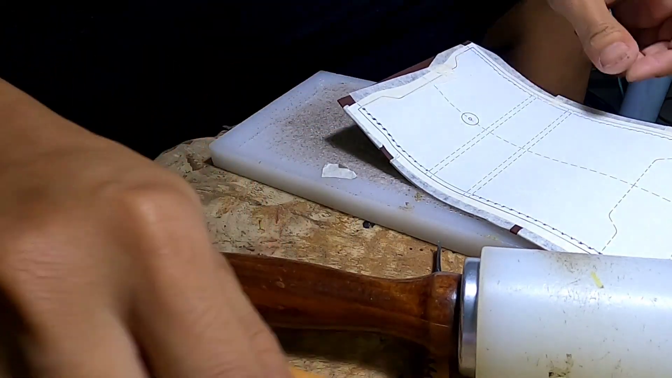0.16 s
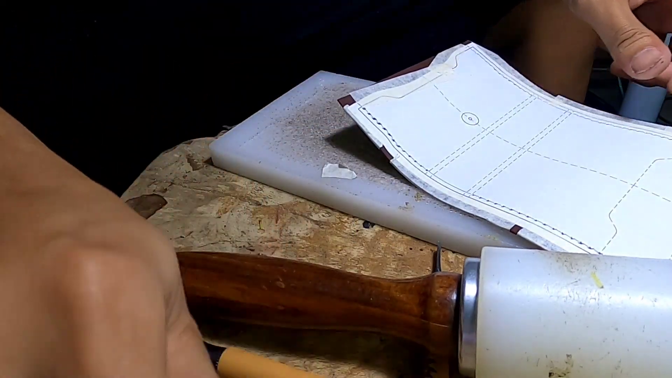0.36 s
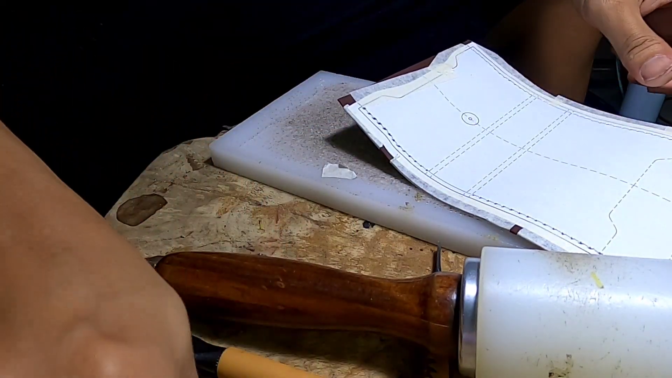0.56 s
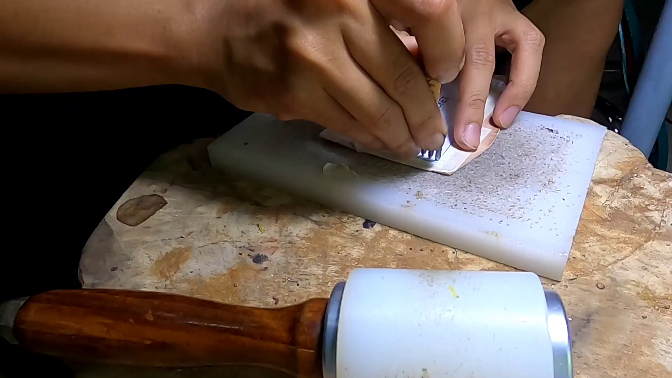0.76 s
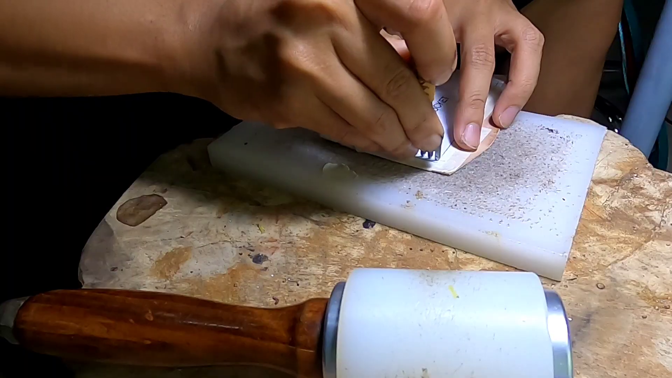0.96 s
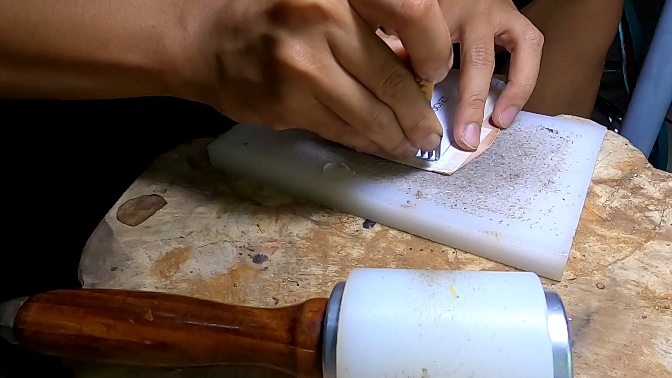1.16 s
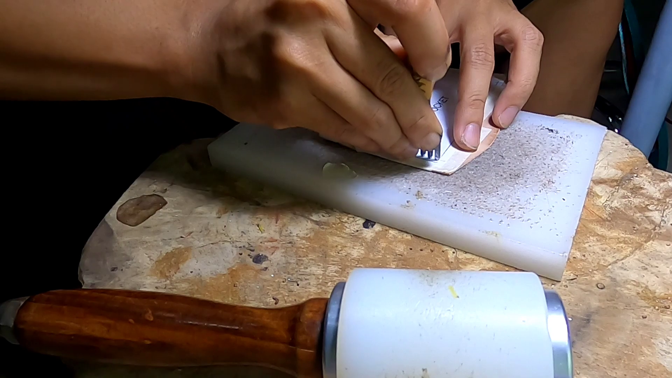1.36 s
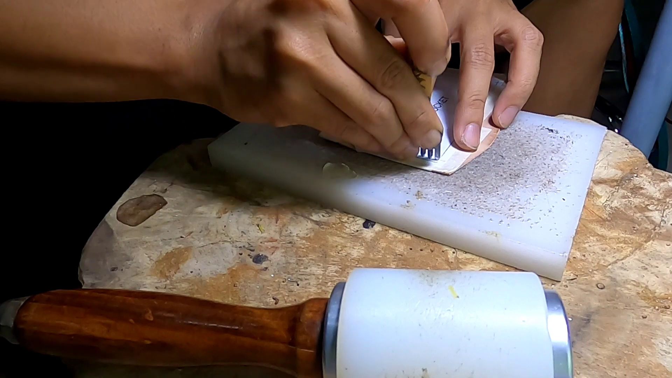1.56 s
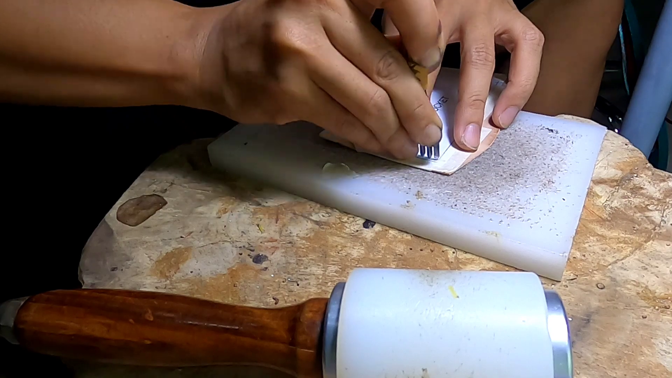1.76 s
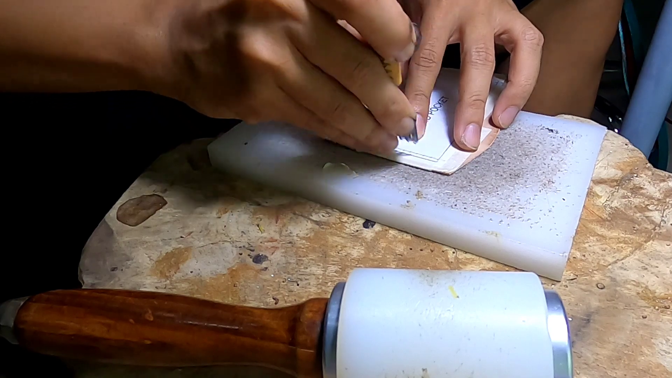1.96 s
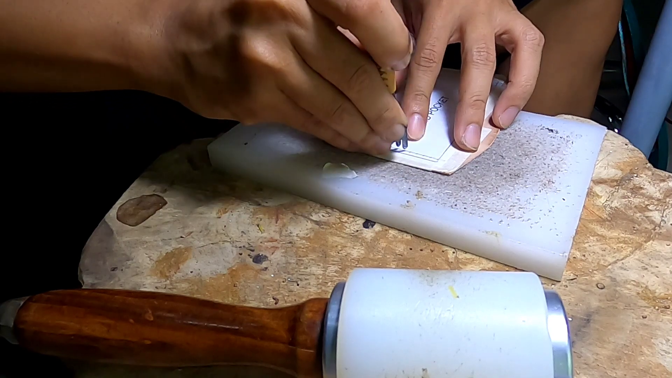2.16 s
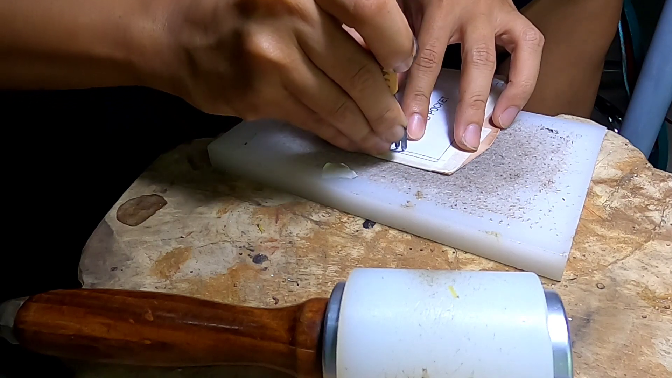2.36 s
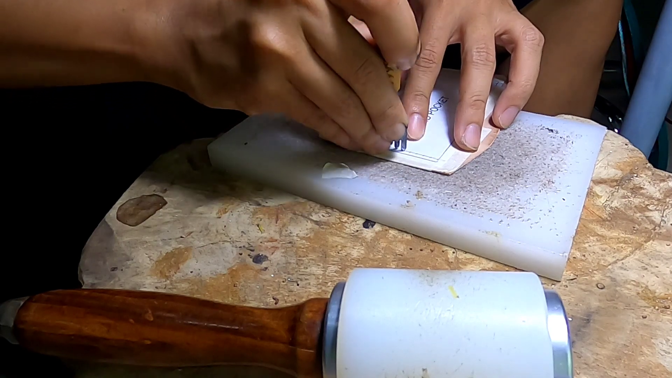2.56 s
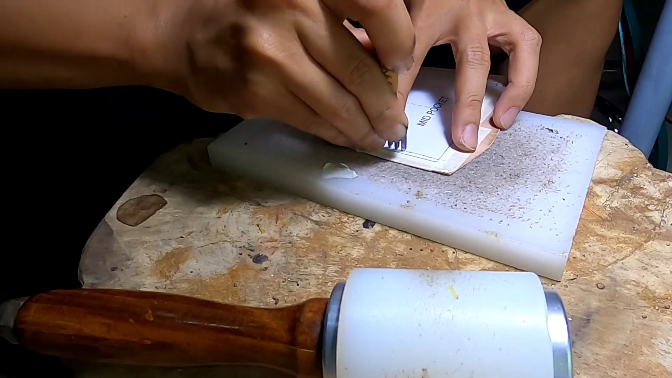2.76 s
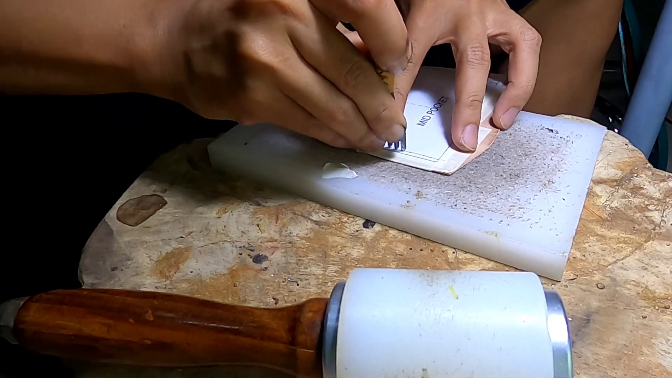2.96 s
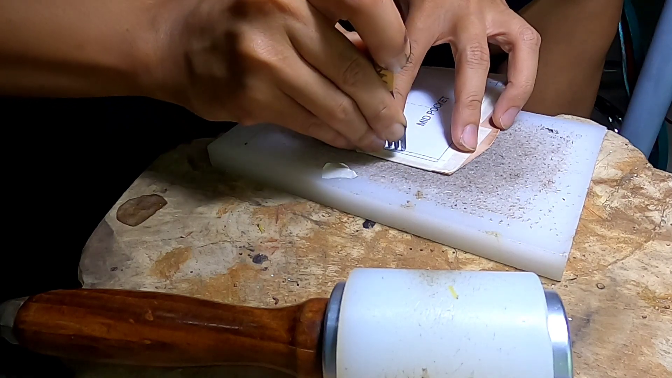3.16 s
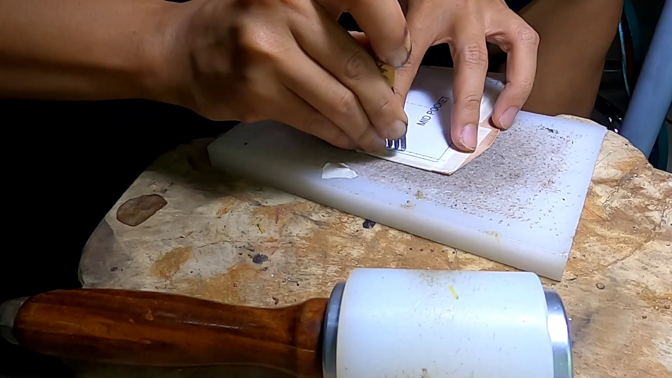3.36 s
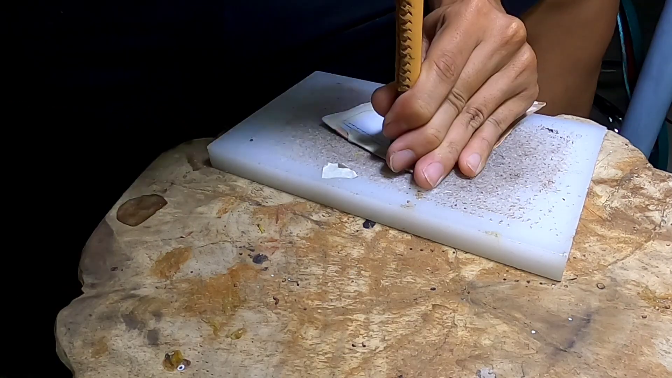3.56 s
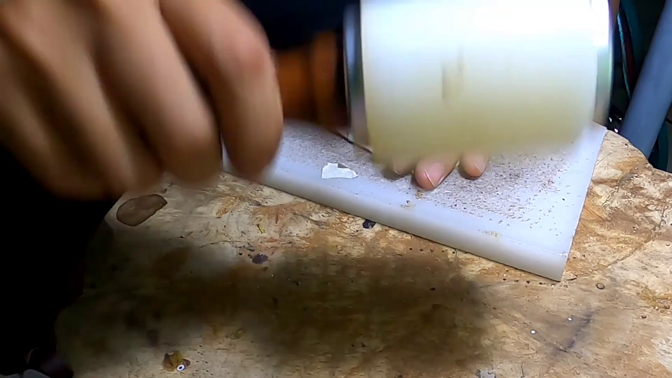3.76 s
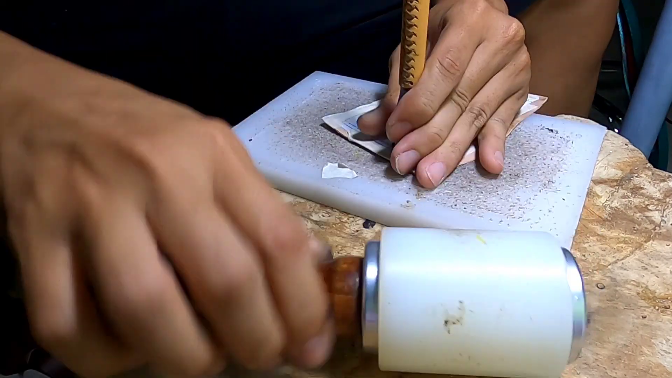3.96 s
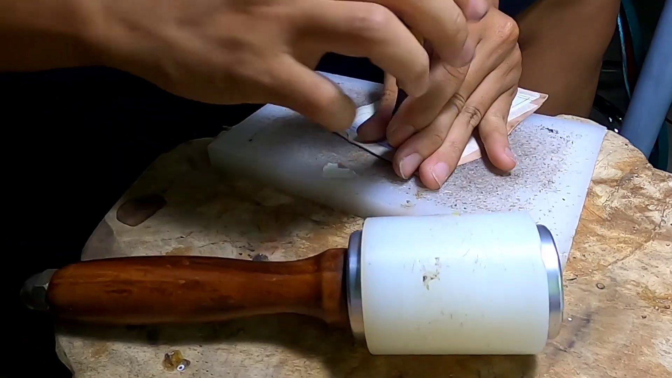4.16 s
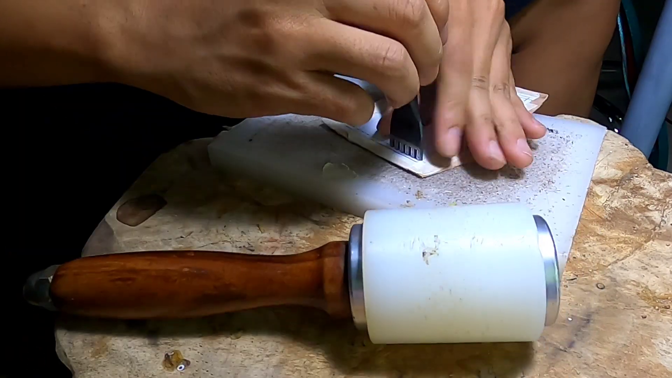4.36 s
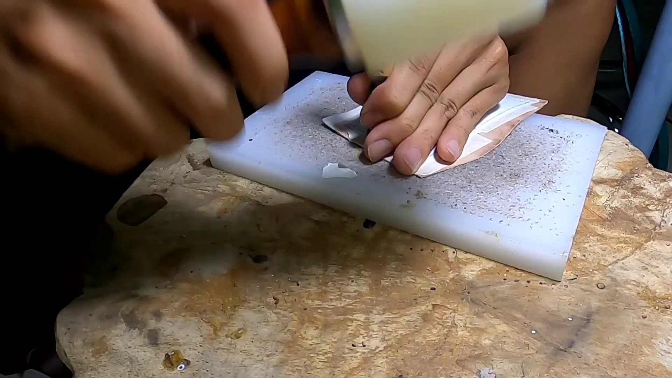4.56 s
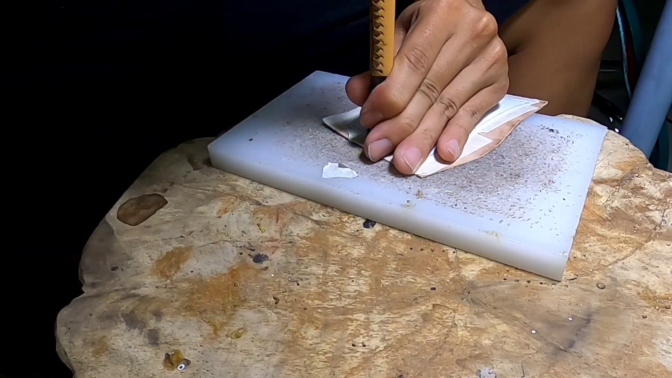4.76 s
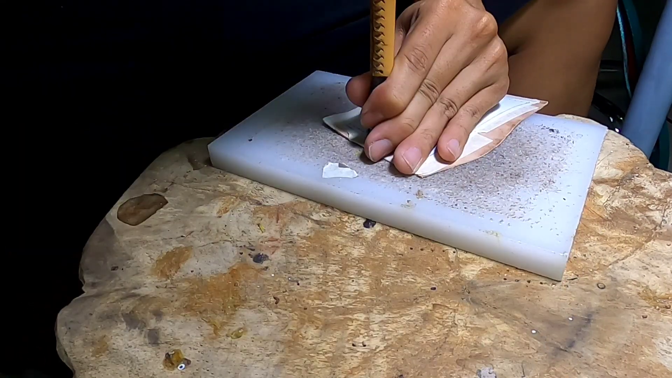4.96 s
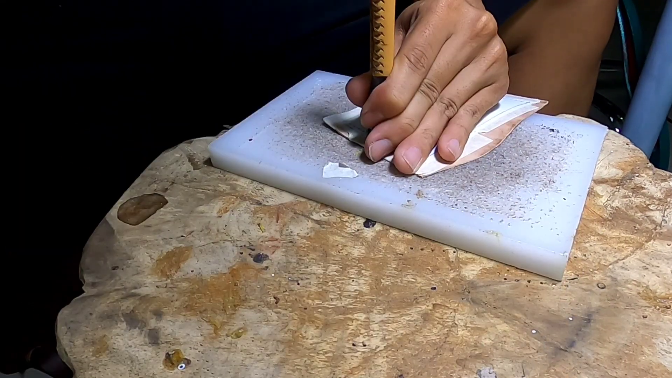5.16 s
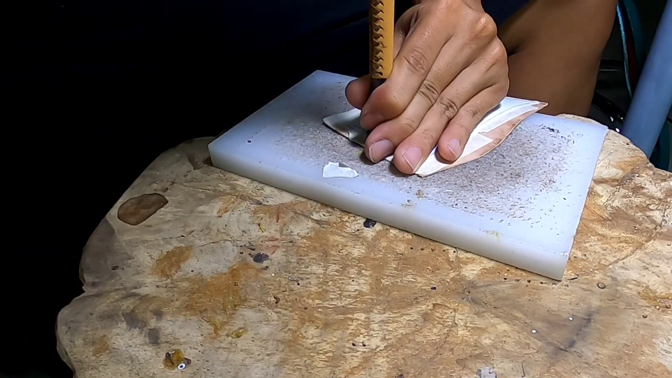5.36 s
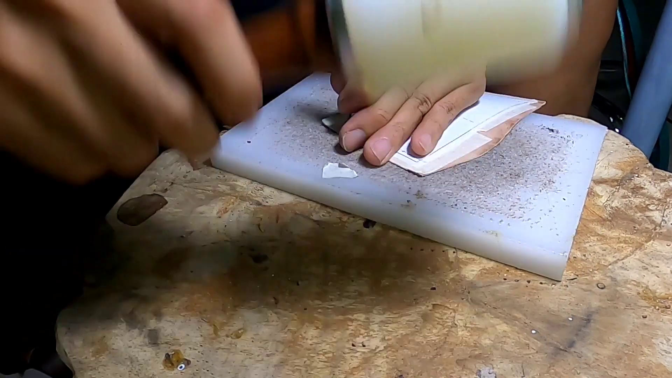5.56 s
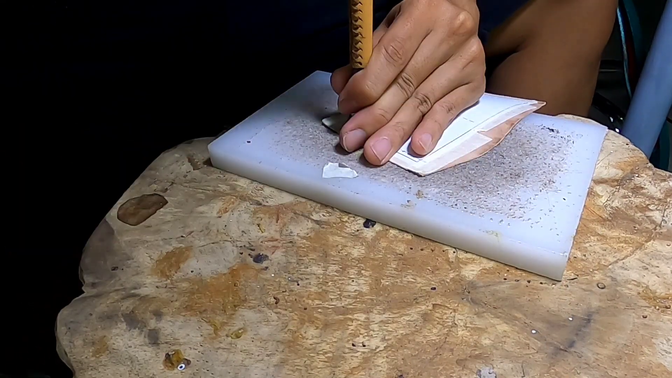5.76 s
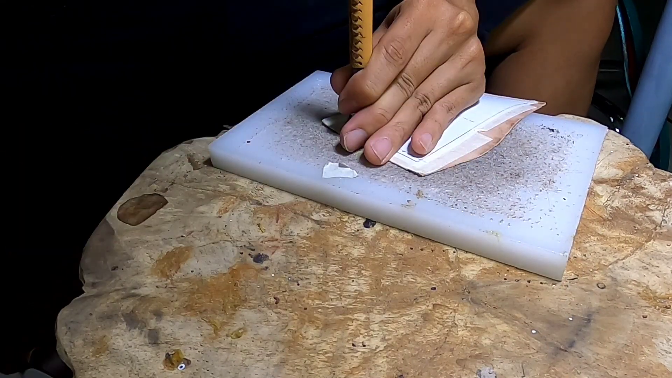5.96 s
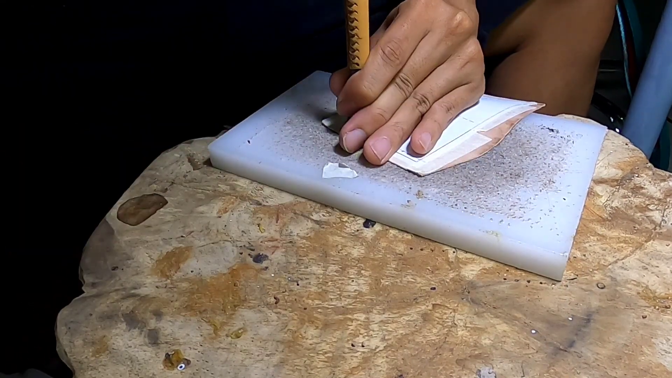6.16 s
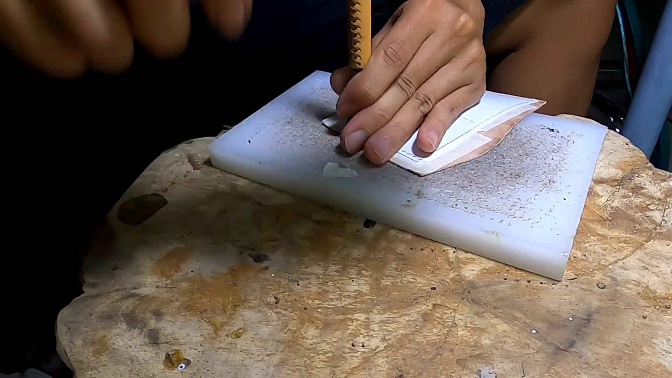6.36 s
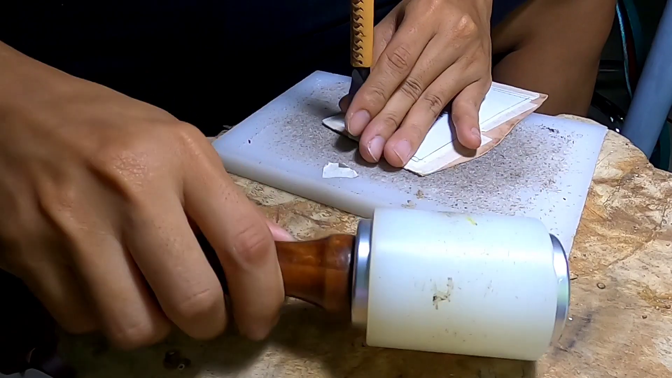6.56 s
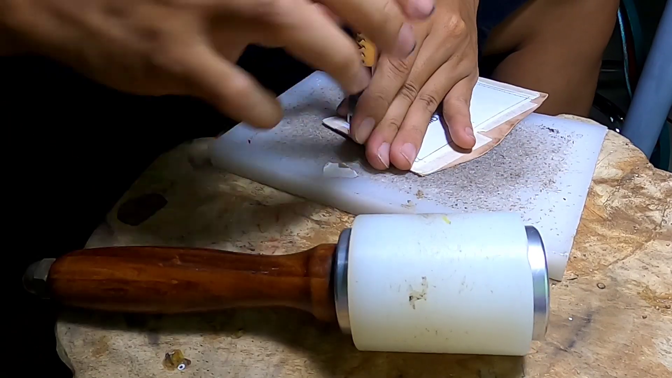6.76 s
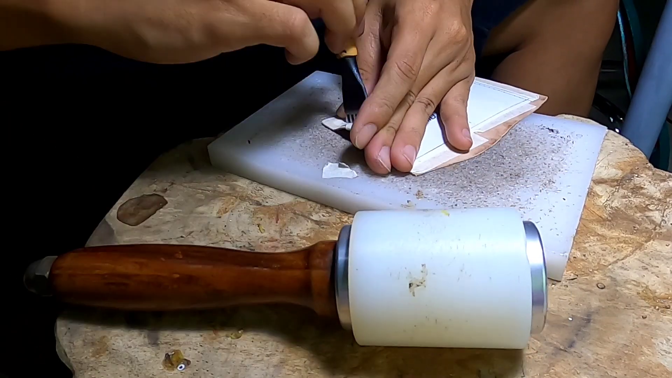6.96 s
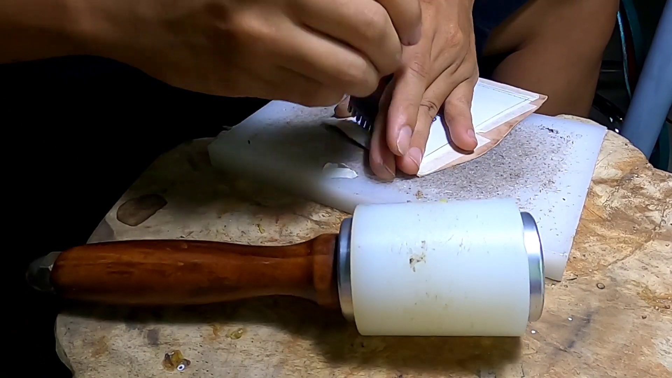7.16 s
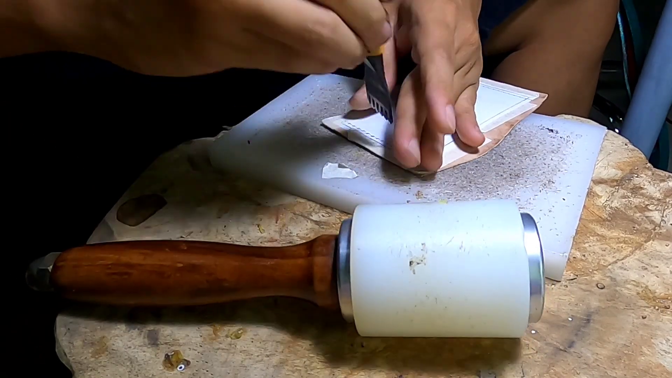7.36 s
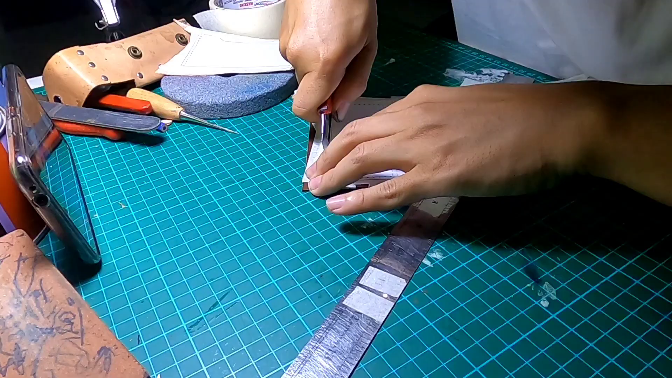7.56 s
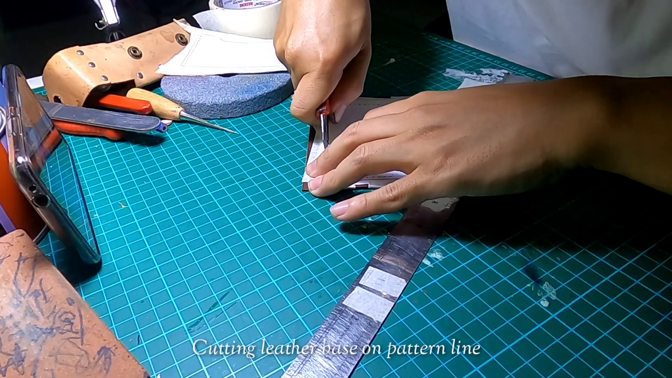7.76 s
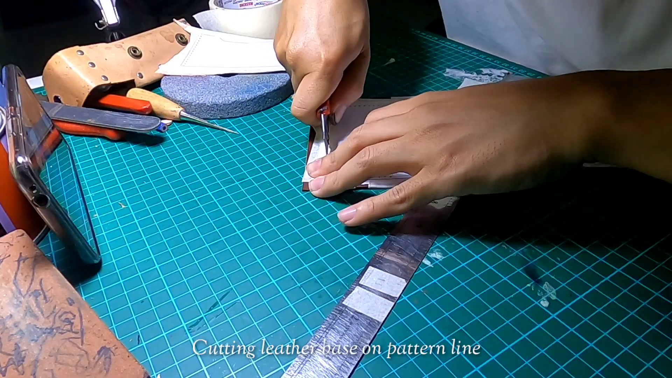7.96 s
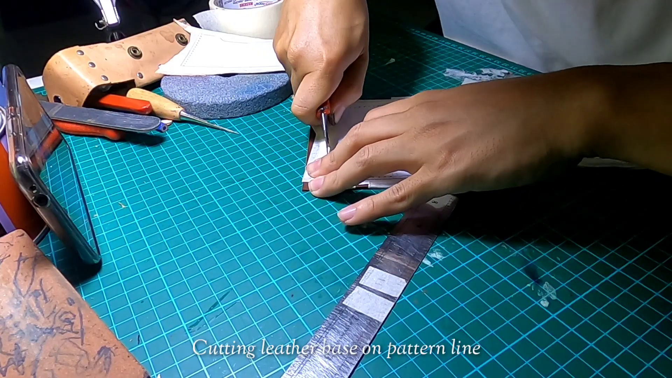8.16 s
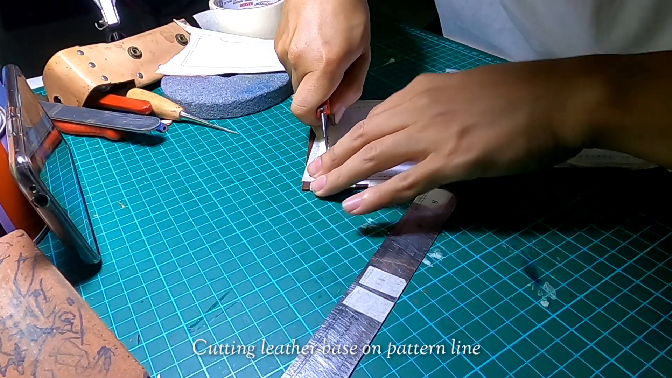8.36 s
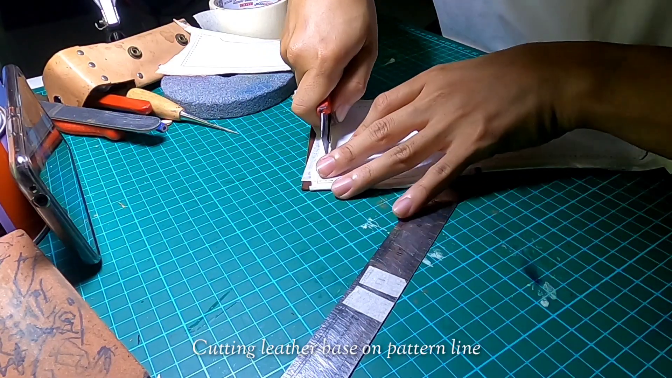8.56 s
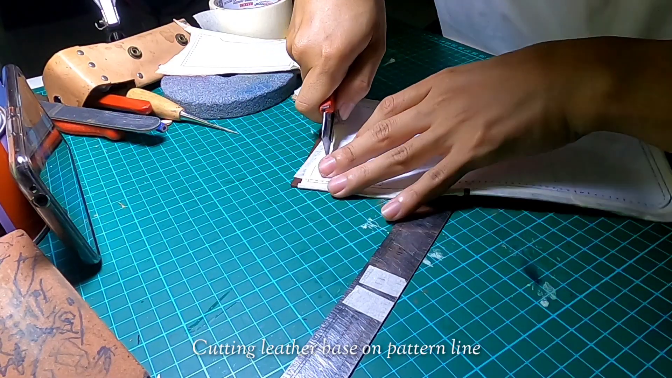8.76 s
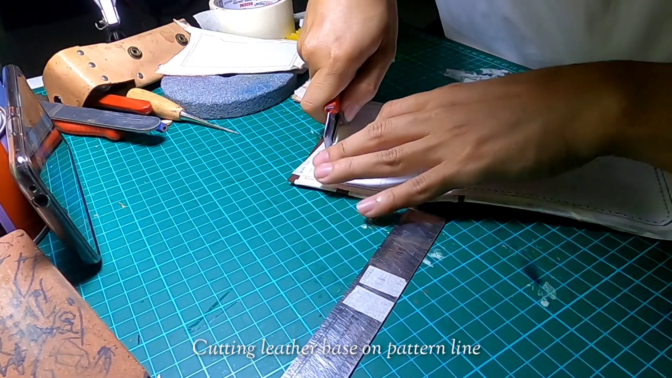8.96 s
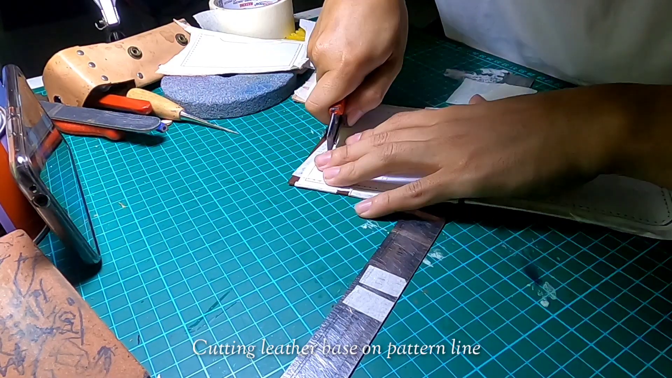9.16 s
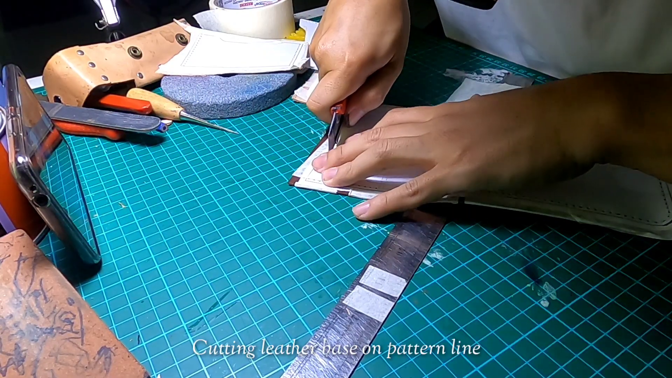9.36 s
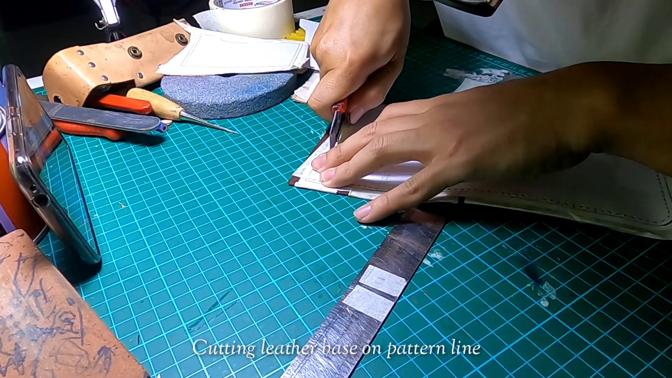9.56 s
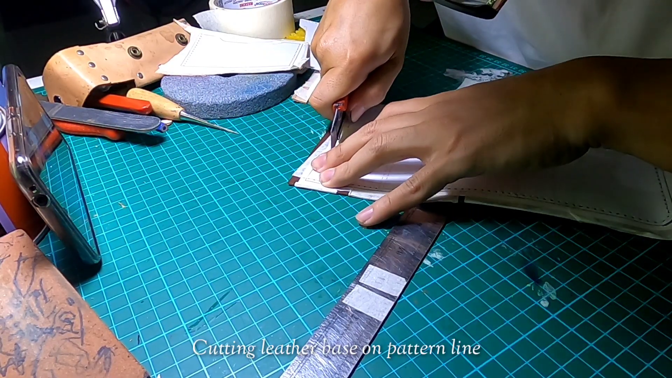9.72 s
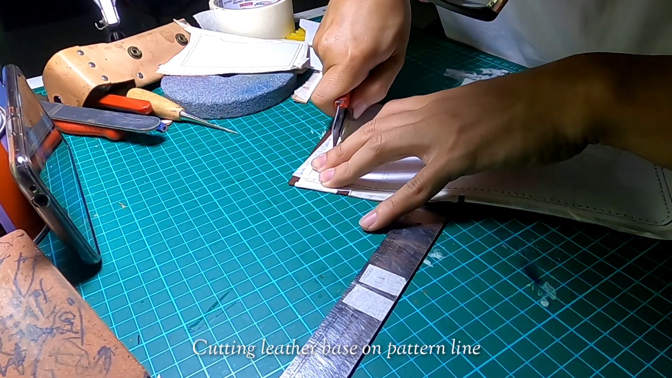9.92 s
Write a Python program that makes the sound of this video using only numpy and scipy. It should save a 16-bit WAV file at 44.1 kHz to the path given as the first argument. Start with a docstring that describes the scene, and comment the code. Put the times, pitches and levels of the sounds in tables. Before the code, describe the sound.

A bright metallic clink rings out, cut to brief silence, then quiet room rumble with faint strokes. A maul hits a steel punch through leather in a fast, very loud burst, then is laid down with a wooden, rocking rattle. More heavy blows follow, another clattering set-down, then leather slides and small taps on a mat. Close stereo microphone in a bare, echoing room, the blows slightly overloaded.

```python
"""An iron clinks on the bench (modal ringing), then silence and a fade-in; soft strokes and swishes (grainy noise).
A plastic maul drives a steel pricking iron through leather into a cutting board on a wooden stump (modes and a
crack); between and after the blows it is laid down and rocks, each contact waking handle, head and steel cap.
Then a new setting brings taps of fingers and tools and a leather sheet sliding on a mat. Room echoes and the rumble
of three settings lie beneath; two close microphone ports and a fast limiter shape the whole."""
import sys
import numpy as np
from scipy import signal
from scipy.fft import rfft, irfft, next_fast_len
from scipy.io import wavfile

SR = 44100
rng = np.random.default_rng(int(sys.argv[2]) if len(sys.argv) > 2 else 0)


def persist_wave(psi):
    """Save psi, clipped to +-1, as 16-bit WAV."""
    counts = np.round(np.clip(psi, -1, 1) * 32767).astype(np.int16)
    wavfile.write(sys.argv[1], SR, np.atleast_2d(counts).T)


N = 440551
SIZE = next_fast_len(N + SR)   # transform length, with a second to spare for echoes

CRACK_HZ, CRACK_T60_S, GRIT_UNDER_CRACK_DB = 3204, 0.016, -10.5
KNOCK_T60_S, KNOCK_RISE_PER_S = 0.0071, 17   # the pitch climbs by this share a second as the contact stiffens
KNOCK_UPPER_RATIO, KNOCK_UPPER_DB = 1.326, -7.5
KNOCK_TOP_RATIO, KNOCK_TOP_DB = 2.5, -20
SEATING_S, THUMP_LAG_S = .0004, .003   # delay of full force and of the stump after first touch
TICK_SPACING_S, TICK_STEP_DB = .010667, -13.5
# Blows of maul on iron, rebounds included: t/s, force level/dB, knock f/Hz,
# then against the force: stump thump level/dB, crack level/dB, last tick before it level/dB, board slap level/dB;
# deepest stump mode against its usual level/dB, slap centre f/Hz
BLOWS = [(3.656, 11, 1165, -25, 22, -34, 0, 0, 4405), (3.701, 9.5, 1237, -11, 3.5, -27, -6.5, -0.5, 2000),
         (3.745, -6.5, 1290, 1, 7.5, -27, -11.5, 2, 2000), (5.101, 10, 1220, -14, 4, -17, -12, -7.5, 2500),
         (5.16, -6.5, 1390, -16, -11.5, -22, -3.5, -6.5, 1600),
         (5.449, 11, 1045, -17.5, 18.5, -27, -9, 0, 2600), (5.493, 1, 1395, -3.5, -1.5, -23.5, -7, 0, 2000),
         (5.958, 11, 1176, -13.5, 2.5, -20, -11.5, -8.5, 2400),
         (6.2997, 14, 1114, -15, 19.5, -29.5, -5.5, -6.5, 2600),
         (6.347, 7.5, 1450, -4.5, -2, -20, -8, -4.5, 1700)]
# Modes of the wooden stump: f/Hz, level/dB, t60/s
STUMP_MODES = [(59.47, -14, 0.46), (146, -23.5, 0.068), (173.2, -10, 0.18), (223.9, 2, 0.061),
               (268, -4.5, 0.069), (310, -17, 0.13)]
# Short rings of the iron's shank in the crack: f/Hz, level/dB, t60/s
SHANK_RINGS = [(2700, -30, 0.0015), (4650, -20.5, 0.002)]
# Hum left by each tick: f/Hz, level against the crack/dB, t60/s
TICK_HUM = (930, -27, 0.08)


def blows():
    """Impact excitation: knock, crack, grit, thump and slap, with evenly spaced faint ticks leading up to each blow."""
    length = 2000
    t = np.arange(length) / SR
    hits, close, ticks = np.zeros((3, N))
    swell = (1 - np.exp(-t / 0.0017)) ** 2
    touch = np.eye(1, length, 30)[0]
    click = soft(soft(touch, CRACK_HZ), CRACK_HZ)
    for hz, level_db, t60 in SHANK_RINGS:
        click = click + from_db(level_db) * ring(touch, hz, t60)
    hum_hz, hum_db, hum_t60 = TICK_HUM
    hum = from_db(hum_db) * ring(touch, hum_hz, hum_t60)
    warped = t + KNOCK_RISE_PER_S * t ** 2 / 2   # integral of the rising pitch

    for s, force_db, hz, _, crack_db, tick_db, *_ in BLOWS:
        phase = 2 * np.pi * hz * warped
        partials = np.sin(phase) - from_db(KNOCK_UPPER_DB) * np.sin(KNOCK_UPPER_RATIO * phase)
        partials = partials + from_db(KNOCK_TOP_DB) * np.sin(KNOCK_TOP_RATIO * phase)
        knock = 5.7 * swell * partials * from_db(-60 * t / KNOCK_T60_S)
        force = from_db(force_db)
        pulse = force * (knock + from_db(crack_db) * click)

        grit_db = crack_db + GRIT_UNDER_CRACK_DB - 60 * t / CRACK_T60_S
        grit = swell * rng.standard_normal(length) * from_db(grit_db)
        crush = force * soft(soft(grit, CRACK_HZ), 0.72 * CRACK_HZ)

        at = round((s + SEATING_S) * SR)
        hits[at:at + length] += pulse
        close[at:at + length] += crush
        tick = pulse + crush + force * from_db(crack_db) * hum
        for k in range(4):   # ticks climb in even steps towards the blow
            early = at - round((k + 1) * TICK_SPACING_S * SR)
            ticks[early:early + length] += tick * from_db(tick_db + k * TICK_STEP_DB)

    s, force_db, _, thump_db, _, _, slap_db, deep_db, slap_hz = np.transpose(BLOWS)
    thump = strike(s + THUMP_LAG_S, force_db + thump_db, STUMP_MODES[1:])
    thump = thump + strike(s + THUMP_LAG_S, force_db + thump_db + deep_db, STUMP_MODES[:1])
    slap = broad_clicks(s, force_db + slap_db, slap_hz)   # heard off the walls
    return hits + soft(thump, contact_hz=587.4), close, ticks, slap


STUMP_UNDER_MAUL_DB = -12
MAUL_SPREAD_DB = 3.5   # each contact finds another spot
CHATTER_S, CHATTER_DB = .0052, -4.5   # the head touches twice
CAP_DB, CAP_FOLLOWS = 6, 1.58   # the steel cap joins in steeply with the force on the head: dB per dB
RATTLE_PER_S, RATTLE_DB = 90, 3   # the rocking head is damped on and off by the stump
WOOD_DB, WOOD_HZ, WOOD_T60_S = -0.5, 1300, .05   # the stump's dry rasp under each contact of the head
WOOD_ROOM_DB, WOOD_ROOM_HZ = 0, 1990   # and its broad click, heard off the walls
# Contacts of the maul rocking as it is laid down: t/s, handle level/dB, head level/dB,
# upper head modes against the head level/dB, top modes against those level/dB
ROCKING = [(4.115, -22, -30.5, -5.5, -2.5), (4.175, -24.5, -26.5, -5.5, -0.5), (4.199, -14.5, -29, -3.5, 2),
           (4.215, -20.5, -16.5, 5.5, 0.5), (4.245, -17.5, -30.5, 6.5, -8), (4.272, -20.5, -40, 3, -6),
           (4.2842, -36, -25.5, 2, -5), (4.301, -25, -37, -0.5, -7), (4.317, -25.5, -36, -3.5, -3),
           (4.336, -29.5, -38, -0.5, -7), (4.357, -30.5, -42, -0.5, -7), (6.76, -18.5, -30, -4.5, 3.5),
           (6.815, -23, -26.5, -5, 0), (6.838, -17.5, -32.5, -0.5, -4.5), (6.856, -23, -15, 5, -2),
           (6.881, -18, -31, 1.5, -2), (6.897, -31, -29.5, -3, -3.5), (6.946, -25.5, -25, 1, -3.5),
           (6.983, -29.5, -35.5, -3.5, -8)]
# Modes of the maul, first four of the handle, the rest of the head: f/Hz, level/dB, t60/s
MAUL_MODES = [(239.4, -22.5, 0.018), (300, 0, 0.045), (323, 2, 0.036), (406.3, -4, 0.072),
              (790, -21.5, 0.04), (914, -2, 0.07), (942, -1, 0.09), (1210, -12.5, .03), (1350, -8.5, 0.038),
              (1613, 0, 0.037), (1704, -3, 0.038), (1780, -7, 0.019), (2283, -6.5, 0.021),
              (2560, -4.5, 0.057), (2680, 0, 0.035), (2770, -4, 0.017), (2950, -5.5, .02),
              (3650, -5.5, .009), (4120, -7, 0.011)]


def maul_laid_down():
    """Modal excitation by force: handle end, head and steel cap speak as far as each contact reaches them."""
    s, handle_db, head_db, upper_db, top_db = np.transpose(ROCKING)
    shaft = strike(s, handle_db, MAUL_MODES[:4], spread_db=MAUL_SPREAD_DB)
    stump = strike(s, handle_db + STUMP_UNDER_MAUL_DB, STUMP_MODES, opposed=True)
    handle = soft(soft(shaft, contact_hz=450, bass_hz=152) + stump, contact_hz=513, bass_hz=90)

    twice, force_db = np.r_[s, s + CHATTER_S], np.r_[head_db, head_db + CHATTER_DB]
    upper_force_db = force_db + np.tile(upper_db, 2)
    top_force_db = force_db + np.tile(upper_db + top_db, 2)
    lower = strike(twice, force_db, MAUL_MODES[4:7], spread_db=MAUL_SPREAD_DB)
    upper = strike(twice, upper_force_db, MAUL_MODES[7:12], opposed=True, spread_db=MAUL_SPREAD_DB)
    top = strike(twice, top_force_db, MAUL_MODES[12:], opposed=True, spread_db=MAUL_SPREAD_DB)
    rasp = scuffs(s, head_db + WOOD_DB, np.full(len(s), WOOD_HZ), WOOD_T60_S)
    head = soft(lower + upper + top + rasp, contact_hz=2520) * flicker(RATTLE_PER_S, RATTLE_DB)

    cap_db = CAP_DB + CAP_FOLLOWS * (head_db + upper_db)
    cap = scuffs(s, cap_db, np.full(len(s), 3500.), t60=0.025)
    wood = broad_clicks(s, head_db + upper_db + WOOD_ROOM_DB, np.full(len(s), WOOD_ROOM_HZ))
    return handle, head, cap, wood


IRON_DAMPED_DB = -5   # the second touch on the bench damps the lowest tone
# Clinks of the iron on the bench: t/s, level/dB
CLINKS = [(.0143, -29), (.228, -60)]
# Modes of the steel iron: f/Hz, level/dB, t60/s
IRON_MODES = [(2762, 9, .42), (4296, -2, .07), (4305, -30, .5), (5278, -16, .16), (5775, -16, .04),
              (5790, -33, .45), (10120, -18, .6), (11390, 5, .03), (12600, 0, .03), (13880, -21, .6)]
# Short twin of the lowest mode: f/Hz, level/dB, t60/s
IRON_SWELL = [(2762, 7, .14)]
# A light touch that wakes only the two long middle modes: t/s, level/dB
RETOUCH = (.299, -41)


def iron_clinks():
    """Modal ringing of steel: a short twin in opposite phase weakens the lowest tone at first, so it blooms late."""
    s, level_db = np.transpose(CLINKS)
    upper = strike(s, level_db, IRON_MODES[1:], spread_db=0)
    touched = strike(RETOUCH[:1], RETOUCH[1], IRON_MODES[2:6:3])
    lowest = strike(s, level_db, IRON_MODES[:1], spread_db=0) - strike(s, level_db, IRON_SWELL, spread_db=0)
    damping_db, = in_time([(s[1] - .02, 0), (s[1] + 0.022, IRON_DAMPED_DB)])
    return upper + touched + lowest * from_db(damping_db)


TAP_T60_S = 0.013
# Fingers and tools on the work: t/s, grit level/dB, thud level/dB, grit centre f/Hz
TAPS = [(0.015, -7, -78, 3000), (0.23, -28.5, -58, 2470), (0.299, -27, -61, 1000), (2.1, -32.5, -57, 3990),
        (2.637, -38.5, -43.5, 4420), (4.598, -31.5, -66, 2250), (4.793, -35.5, -68.5, 4900),
        (4.813, -39, -63, 4220), (4.902, -46, -77, 4080), (5.792, -32, -57, 3800), (5.833, -30, -53, 3740),
        (7.319, -22, -90, 2230), (7.4234, -31.5, -83, 2330), (7.66, -33, -79, 2450),
        (7.856, -29, -54, 6000), (8.581, -28, -80, 2540), (8.7189, -14, -48, 3040), (9.085, -52, -56, 2636),
        (9.318, -42.5, -80, 6570), (9.5945, -28.5, -81.5, 4910)]
# Modes of the thud: f/Hz, level/dB, t60/s
THUD_MODES = [(61, -3, 0.12), (130, 0, .12), (213, 8, 0.11), (284, 2, 0.05)]
# Small hollow knocks of tools: t/s, level/dB, f/Hz, t60/s
TOOL_KNOCKS = [(.013, -41, 445, 0.036), (.066, -45, 350, 0.027), (0.229, -32, 298, 0.042),
               (0.283, -42, 344, 0.034), (2.635, -43.5, 990, 0.013), (8.713, -44, 1400, 0.011),
               (8.7205, -34.5, 1346, .02), (8.724, -35, 1330, 0.037)]


def hands_and_tools():
    """Soft contact: bursts of surface grit over low thud modes, with small single-mode knocks."""
    s, grit_db, thud_db, grit_hz = np.transpose(TAPS)
    grit = scuffs(s, grit_db, grit_hz, TAP_T60_S)
    thuds = soft(strike(s, thud_db, THUD_MODES, opposed=True), contact_hz=500)
    knocks = np.zeros(N)
    for at, level_db, hz, t60 in TOOL_KNOCKS:
        knocks += soft(strike([at], level_db, [(hz, 0, t60)]), 2 * hz)
    return grit + thuds + knocks


STROKE_RISE_DB_S, STROKE_FALL_DB_S = 482.5, 277
SHEET_RING_WIDTH = 0.19   # as a share of the pitch, to either side
GRAINS_PER_S, GRAIN_DB = 240, 2
# Soft strokes and swishes: full from t/s, held t/s, level/dB, hiss against it level/dB,
# moving ring f/Hz, ring against the stroke level/dB
STROKES = [(1.83, 0.068, -84.5, -14, 1200, 15), (2.095, 0.022, -76.5, 5, 1200, 0),
           (2.875, 0.06, -76.5, 8.5, 3500, 1), (3.551, 0.11, -71, -32, 1345, 12.5),
           (4.445, 0.029, -63, -8, 1600, 8.5), (4.712, 0.029, -68, -1.5, 2530, -24),
           (4.852, 0.074, -65, -11, 1320, -11), (7.325, 0.021, -61, -7, 2300, -1),
           (7.432, 0.034, -72.5, -1, 2330, -1), (7.666, 0.06, -68, 0.5, 2395, -14),
           (7.8, 2.2, -77, -6, 1080, 1.5), (8.191, 0.076, -68, -4, 2260, 1),
           (8.601, 0.033, -59.5, 5.5, 1296, -17), (8.74, 0.0061, -58, -4, 1375, -4),
           (8.818, 0.086, -44.5, -7, 2700, -9), (8.97, 0.045, -54, -4, 1280, -24),
           (9.007, 0.02, -45.5, -12.5, 2680, -7), (9.09, 0.13, -76, -23, 1350, 16.5),
           (9.23, 0.029, -77, 4.5, 2520, -11.5), (9.56, 0.1, -71, -7, 2100, 0),
           (9.75, .3, -75.5, -3, 2100, 2.5)]
# Colour of the fixed resonances: f/Hz, level per Hz/dB
RUB_BODY = [(350, -54.5), (600, -22), (900, -12), (1150, -3), (1480, -3), (1900, -9), (2300, -6), (2640, 1),
            (3000, -5), (3450, -6), (3830, -2), (4400, -11), (5000, -13), (6500, -35), (11000, -90)]
# Colour of the hiss: f/Hz, level per Hz/dB
RUB_HISS = [(2350, -33), (4000, -1), (6480, -3), (8940, -3.5), (10800, -10), (12400, -14.5), (15500, -30.5)]


def rubbing():
    """Friction noise: grains in the sheet's resonances, one of which moves with the grip; hiss lies on top."""
    body, hiss, rings = np.zeros(N), np.zeros(N), np.zeros((2, N))
    grains = flicker(GRAINS_PER_S, GRAIN_DB)
    white = grains * diffuse_noise([(1, 0), (2, 0)])
    for s, held, level_db, hiss_db, ring_hz, ring_db in STROKES:
        near = slice(int((s - .3) * SR), min(N, int((s + held + .4) * SR)))
        t = np.arange(N)[near] / SR
        slopes_db = np.minimum(STROKE_RISE_DB_S * (t - s), STROKE_FALL_DB_S * (s + held - t))
        stroke = from_db(level_db + np.minimum(0, slopes_db))   # rises, holds and falls
        body[near] += stroke
        hiss[near] += stroke * from_db(hiss_db)
        edges = ring_hz * (1 + SHEET_RING_WIDTH) ** np.array([-1, 1])
        band = signal.butter(2, edges, "band", fs=SR, output="sos")
        rings[:, near] += stroke * from_db(ring_db) * rms_one(signal.sosfilt(band, white[:, near]))
    body = body * grains * flicker(52, depth_db=0.5) * diffuse_noise(RUB_BODY)
    hiss = hiss * np.sqrt(grains) * flicker(39, depth_db=1.5) * diffuse_noise(RUB_HISS)
    return body + rings + hiss


ROOM_BUILD_S = 0.01
# Reverberation of the bare room: f/Hz, level/dB, t60/s
ROOM = [(61, -22, 0.35), (100, -24, .45), (150, -15.5, 0.41), (227, -24.5, 0.31), (332, -21.5, 0.7),
        (440, -20.5, 0.54), (634, -32.5, 0.75), (820, -26, 0.9), (1065, -30, 0.97), (1410, -21, 0.95),
        (2160, -21, 0.86), (2580, -24, 0.94), (3750, -24.5, 0.94), (4970, -36, 0.97), (5700, -29, 0.93),
        (7000, -28, 0.73), (10000, -33, 1), (13800, -36.5, 0.18)]


def room(x, other):
    """Reverberation: echoes build up, then decay band by band; the two sources get unrelated echoes."""
    t, echo = np.arange(SR) / SR, 0
    edges = 40 * 2 ** np.arange(0, 9, 1 / 3)   # third octaves
    # axes: ear, source, even or odd band, time
    white = diffuse_noise([(1, 0), (2, 0)])[:, :4 * SR].reshape(2, 2, 2, SR)
    for k, (low, high) in enumerate(zip(edges, edges[1:])):   # neighbouring bands get unrelated noise
        hz = np.sqrt(low * high)
        third = signal.butter(2, [low, high], "band", fs=SR, output="sos")
        decay_db = at_hz(ROOM, hz) - 15.5 - 60 * t / at_hz(ROOM, hz, column=2)
        echo = echo + signal.sosfilt(third, white[:, :, k % 2]) * from_db(decay_db)
    echo = echo * (1 - np.exp(-(t / ROOM_BUILD_S) ** 2))
    spectra = rfft(np.array([x, other]), SIZE) * rfft(echo, SIZE)
    return irfft(spectra.sum(axis=1), SIZE)[:, :N]


SNAP_BACK_S = .04
# Level bends of the echo tails: from t/s, extreme at t/s, depth level/dB
TAIL_BENDS = [(4.524, 4.713, -5), (5.715, 5.912, -40.5), (6.998, 7.595, 0.5)]


def tail_gain():
    """Decay modified by a gain: each listed echo tail ramps to its depth, then quickly returns."""
    t, gain_db = np.arange(N) / SR, 0
    for s, extreme, depth_db in TAIL_BENDS:
        gain_db = gain_db + np.interp(t, [s, extreme, extreme + SNAP_BACK_S], [0, depth_db, 0])
    return from_db(gain_db)


LUMPY_BELOW_HZ = 250
# Colour of room rumble and hiss, one list for each setting: f/Hz, level per Hz/dB
RUMBLE = [
    [(12, -52), (20, -19), (32, -10), (53, -10), (100, -26), (174, -5), (229, -20.5), (347, -23),
     (409, -26), (865, -43.5), (1210, -32.5), (2410, -50), (2850, -41), (3270, -47), (15000, -58.5)],
    [(12, -42.5), (20, -14.5), (49, -1), (76, -20), (132, -7.5), (155, -12), (302, -17.5), (337, -27),
     (387, -22), (421, -31), (1050, -34.5), (4950, -49), (7300, -42.5), (7930, -53.5), (10500, -54),
     (15000, -63)],
    [(12, -35), (20, -19), (54, 8.5), (139, -10), (178, 1.5), (302, -17), (445, -12), (484, -18.5),
     (713, -23.5), (796, -27.5), (1110, -21.5), (3550, -41), (4310, -46), (7100, -34.5), (15000, -69)],
]
# Course of that background, one list for each setting: t/s, level/dB
RUMBLE_LEVEL = [
    [(0, -52), (.4, -58.5), (.79, -59.5)],
    [(.84, -59), (3.4, -57.5), (4.68, -62.5), (4.9, -55.5), (6.0, -50.5), (7.2, -55.5), (7.6, -57.5)],
    [(7.6, -60.5), (8.0, -50.5), (8.5, -52.5), (8.8, -44.5), (9.26, -51), (9.99, -49)],
]


def rumble():
    """Diffuse background noise: each setting has its own colour, lumpy in the bass and steadier above."""
    steady = np.zeros((2, N))
    for level, colour in zip(RUMBLE_LEVEL, RUMBLE):
        level_db, = in_time(level, -200)   # inaudible outside its own setting
        steady += from_db(level_db) * diffuse_noise(colour)
    bass = signal.sosfilt(signal.butter(4, LUMPY_BELOW_HZ, fs=SR, output="sos"), steady)
    upper = signal.sosfilt(signal.butter(4, LUMPY_BELOW_HZ, "high", fs=SR, output="sos"), steady)
    return bass * flicker(16, depth_db=3.0) + upper * flicker(14, depth_db=1.6)


def from_db(db):
    """Level to amplitude: 20 dB is a factor of ten."""
    return 10 ** (np.asarray(db) / 20)


def rms_one(x):
    """Normalisation to unit root mean square."""
    return x / np.sqrt(np.mean(x ** 2) + 1e-20)


def in_time(rows, outside=None):
    """Linear interpolation in time: columns of a curve, one value a sample."""
    s, *columns = np.transpose(rows)
    return [np.interp(np.arange(N) / SR, s, c, outside, outside) for c in columns]


def at_hz(points, hz, column=1):
    """Interpolation along logarithmic frequency."""
    points = np.array(points)
    return np.interp(np.log(hz + 1e-3), np.log(points[:, 0]), points[:, column])


def ring(clicks, hz, t60):
    """Damped resonator: a unit click sets a decaying sine of initial height 1 ringing."""
    r, w = from_db(-60 / (t60 * SR)), 2 * np.pi * hz / SR
    return signal.lfilter([0, np.sin(w)], [1, -2 * r * np.cos(w), r * r], clicks + 1e-18)


MODE_SPREAD_DB = 1.5   # spread of mode strengths from one contact to the next


def strike(times, levels_db, modes, opposed=False, spread_db=MODE_SPREAD_DB):
    """Modal superposition: every contact rings every mode with a strength of its own."""
    out, luck = np.zeros(N), rng.normal(0, 1, (len(times), len(modes)))
    at = np.round(np.asarray(times) * SR).astype(int)
    heard = slice(at.min(), at.max() + SR)
    for k, (hz, level_db, t60) in enumerate(modes):
        clicks = np.zeros(N)
        clicks[at] = from_db(levels_db + level_db + spread_db * luck[:, k])
        sign = (-1) ** (k * opposed)   # opposed: neighbours start in opposite phase
        out[heard] += sign * ring(clicks[heard], hz, t60)
    return out


def soft(x, contact_hz, bass_hz=45):
    """Contact duration and radiation: a lasting contact carries no treble, a small body no deep bass."""
    x = signal.sosfilt(signal.butter(2, contact_hz, fs=SR, output="sos"), x)
    return signal.sosfilt(signal.butter(2, bass_hz, "high", fs=SR, output="sos"), x)


GRIT_RISE_S = 0.005


def scuffs(times, levels_db, centres_hz, t60):
    """Decaying band noise: short bursts of grit around a broad centre."""
    length = 3000
    out, t = np.zeros(N), np.arange(length) / SR
    rise = 1 - np.exp(-t / GRIT_RISE_S)
    for s, level_db, hz in zip(times, levels_db, centres_hz):
        band = signal.butter(2, [hz / 1.8, min(hz * 1.8, SR * .45)], "band", fs=SR)
        grit = signal.lfilter(*band, rng.standard_normal(length))
        at = round(s * SR)
        out[at:at + length] += grit * from_db(level_db - 60 * t / t60) * rise
    return out


def broad_clicks(times, levels_db, centres_hz):
    """Band-limited impulses: single clicks over an octave and more, with no ring of their own."""
    out = np.zeros(N)
    for s, level_db, hz in zip(times, levels_db, centres_hz):
        at = round(s * SR)
        band = signal.butter(2, [hz / 2.0, hz * 1.233], "band", fs=SR)
        impulse = np.eye(1, 1000)[0] * SR / hz / 2   # a lower band needs a taller impulse
        out[at:at + 1000] += from_db(level_db) * signal.lfilter(*band, impulse)
    return out


# Diffuse sound: f/Hz, left-right correlation
LIKENESS = [(60, 0.93), (180, 0.94), (550, 0.78), (1650, 0.79), (4970, 0.25), (15000, 0.01)]


def diffuse_noise(spectrum):
    """Diffuse field: coloured stereo noise of rms 1, correlated in the bass and freer in the treble."""
    hz = np.fft.rfftfreq(SIZE, 1 / SR)
    mid, side = rfft(rng.standard_normal((2, SIZE)))
    alike = np.clip(at_hz(LIKENESS, hz), 0, 1)
    pair = np.sqrt(1 + alike) * mid + np.sqrt(1 - alike) * side * [[1], [-1]]
    return rms_one(irfft(pair * from_db(at_hz(spectrum, hz)), SIZE)[:, :N])


def flicker(rate, depth_db):
    """Random amplitude modulation: a gain that wanders at about rate times a second."""
    knots = rng.standard_normal(N // 64)
    return from_db(depth_db * np.interp(np.arange(N) / SR * rate, np.arange(len(knots)), knots))


TICK_ROOM_DB, HANDLE_ROOM_DB, HEAD_ROOM_DB = 10, 1, -12.5   # how much of each reaches the walls
CAP_ROOM_DB, HANDS_ROOM_DB, IRON_ROOM_DB = -8, -6, -18


def scene():
    """Superposition: direct sound, echoes, friction noise and background add linearly."""
    hits, close, ticks, slap = blows()
    handle, head, cap, wood = maul_laid_down()
    iron, hands = iron_clinks(), hands_and_tools()
    to_walls = hits + from_db(TICK_ROOM_DB) * ticks + from_db(HANDLE_ROOM_DB) * handle
    to_walls = to_walls + from_db(HEAD_ROOM_DB) * head + from_db(CAP_ROOM_DB) * cap
    to_walls = to_walls + from_db(HANDS_ROOM_DB) * hands + from_db(IRON_ROOM_DB) * iron
    echoes = room(to_walls, slap + wood)   # slap and wood clicks get echoes unrelated to the rest
    direct = hits + close + ticks + handle + head + cap + iron + hands
    return direct + tail_gain() * echoes + rubbing() + rumble()


CUT_S, SILENCE_S, FADE_IN_S = .789, .048, .09


def cut_gain():
    """Gain envelope: near silence and a fade-in at the first cut."""
    back = CUT_S + SILENCE_S
    return np.interp(np.arange(N) / SR, [CUT_S, CUT_S + .003, back, back + FADE_IN_S], [1, .002, .002, 1])


PORT_LAG_S = 36e-6   # the left port hears this much later than the right
LIMIT_DB, LIMIT_SHARE = -6.5, 0.86   # threshold, and the share of the excess taken away
RELEASE_DB_S, ATTACK_S, LOOK_AHEAD_S, MAKE_UP_DB = 106.5, 0.0069, 0.0016, 2
CUTOFF_HZ = 15900
# Balance of the two ports: f/Hz, left minus right level/dB
PORT_BALANCE = [(60, 1), (150, 0.5), (380, 0), (950, 0.5), (2380, 3.5), (5980, 1.5), (15000, -1.5)]


def record(dry):
    """Time difference and limiting: two ports, a limiter that lets the first instant overload, the cut, a top cut."""
    hz = np.fft.rfftfreq(SIZE, 1 / SR)
    half = from_db(at_hz(PORT_BALANCE, hz) / 2) * np.exp(-1j * np.pi * hz * PORT_LAG_S)
    x = irfft(rfft(dry, SIZE) * [half, 1 / half], SIZE)[:, :N]

    # peak level that falls no faster than the release
    ramp = RELEASE_DB_S * np.arange(N) / SR
    peak_db = 20 * np.log10(np.abs(x).max(axis=0) + 1e-9)
    held_db = np.maximum.accumulate(peak_db + ramp) - ramp
    excess_db = LIMIT_SHARE * np.maximum(held_db - LIMIT_DB, 0)
    r = np.exp(-1 / (ATTACK_S * SR))
    reduction_db = signal.lfilter([1 - r], [1, -r], excess_db)
    reduction_db = np.interp(np.arange(N) + LOOK_AHEAD_S * SR, np.arange(N), reduction_db)

    x = np.clip(x * cut_gain() * from_db(MAKE_UP_DB - reduction_db), -.94, .94)
    top_cut = signal.cheby2(12, 70, CUTOFF_HZ + 600, fs=SR, output="sos")   # 70 dB down from its stopband edge
    # clip and top cut once more, so that little treble remains above the cutoff
    x = np.clip(signal.sosfilt(top_cut, x), -.94, .94)
    return signal.sosfilt(top_cut, x)


dry = scene()
out = record(dry)
persist_wave(out)
```